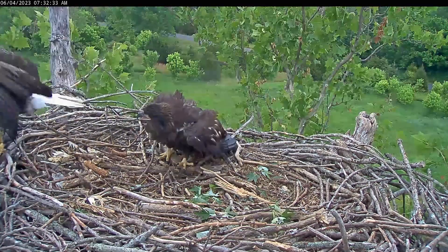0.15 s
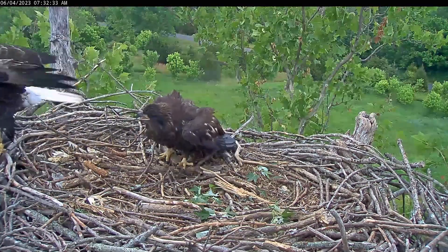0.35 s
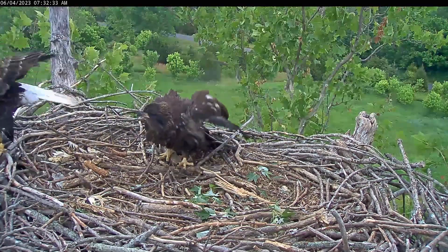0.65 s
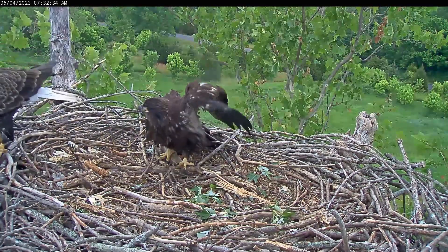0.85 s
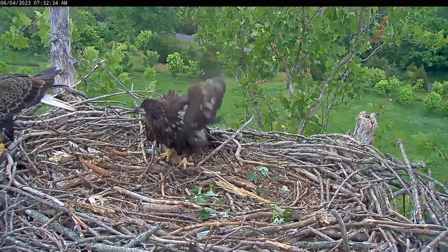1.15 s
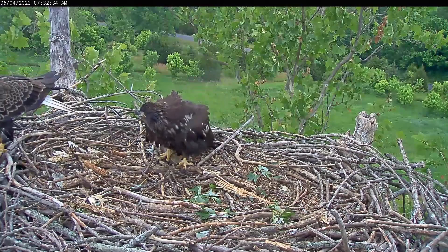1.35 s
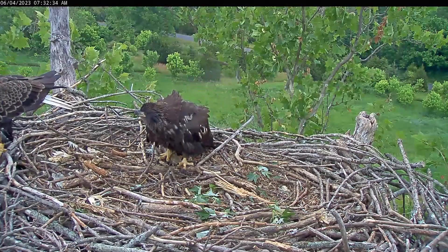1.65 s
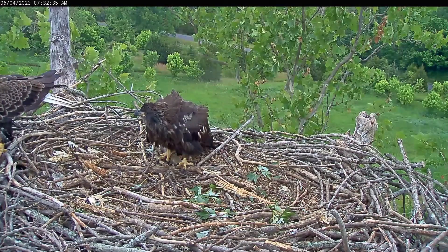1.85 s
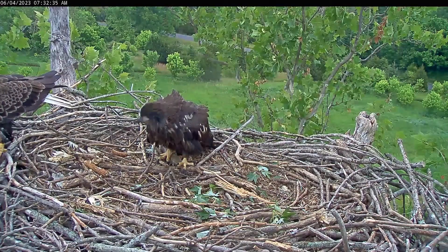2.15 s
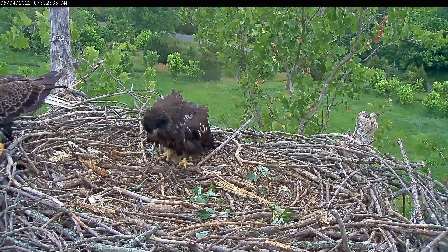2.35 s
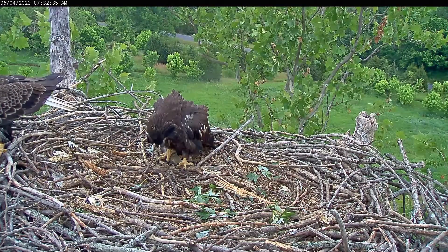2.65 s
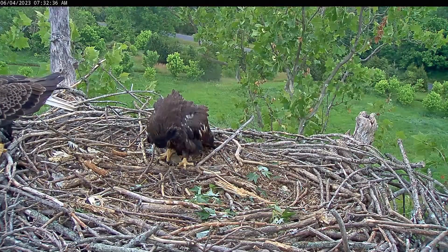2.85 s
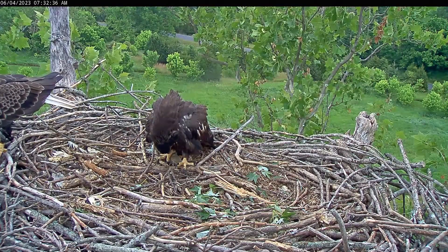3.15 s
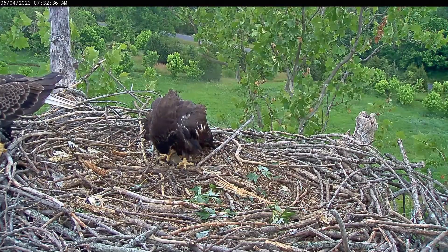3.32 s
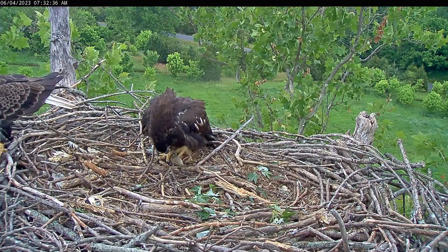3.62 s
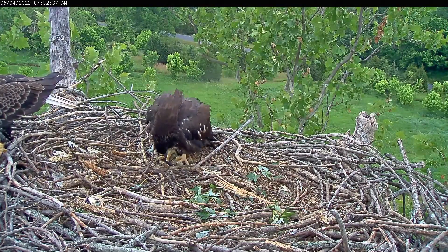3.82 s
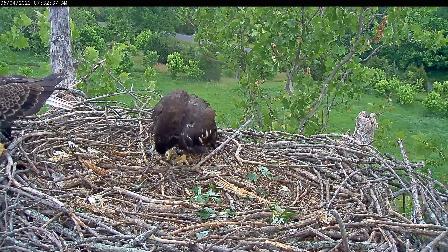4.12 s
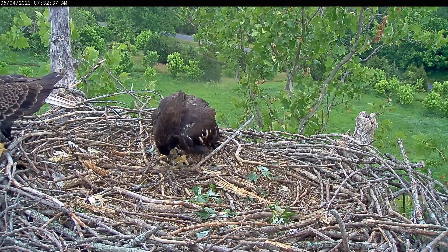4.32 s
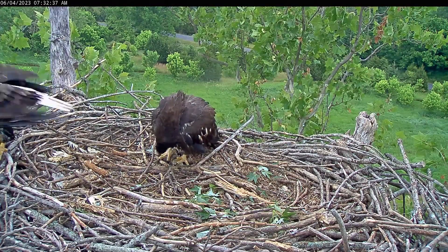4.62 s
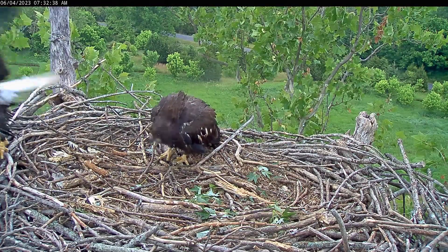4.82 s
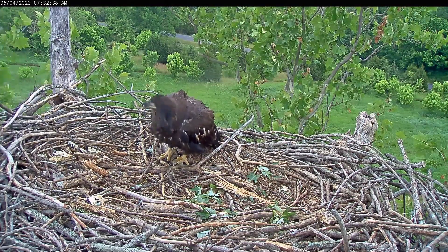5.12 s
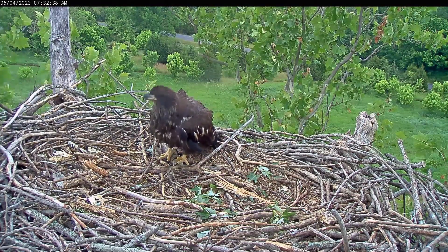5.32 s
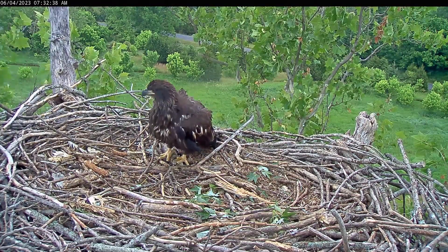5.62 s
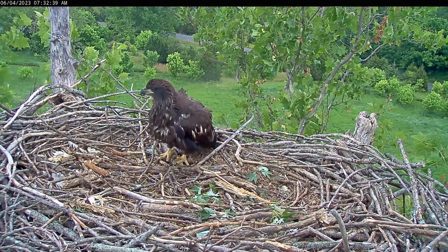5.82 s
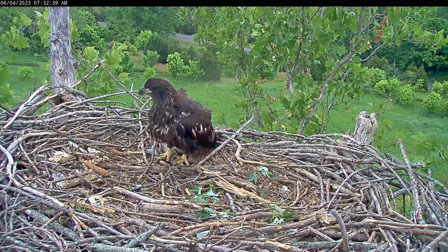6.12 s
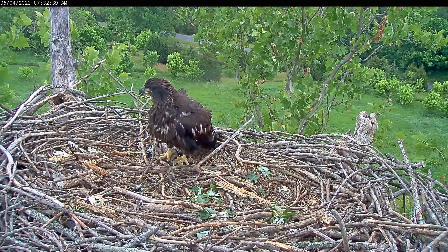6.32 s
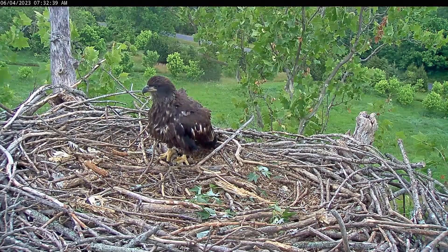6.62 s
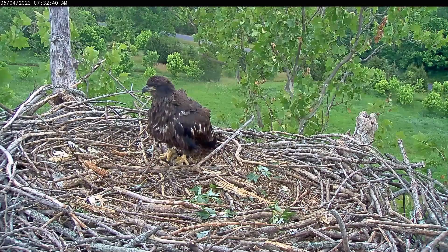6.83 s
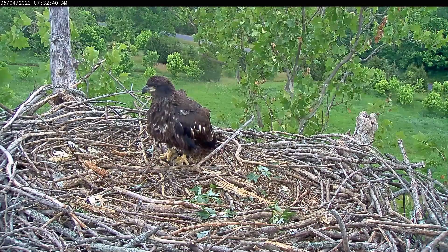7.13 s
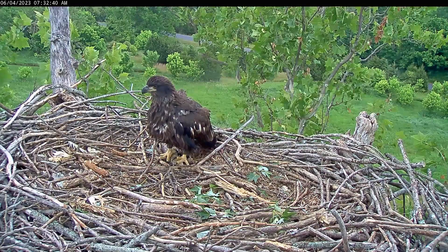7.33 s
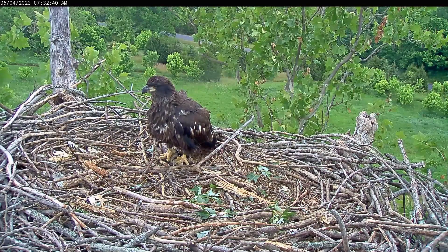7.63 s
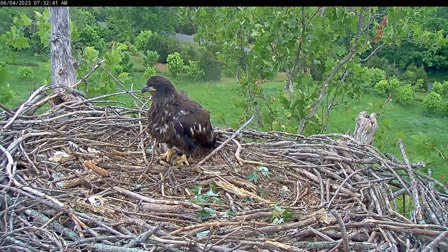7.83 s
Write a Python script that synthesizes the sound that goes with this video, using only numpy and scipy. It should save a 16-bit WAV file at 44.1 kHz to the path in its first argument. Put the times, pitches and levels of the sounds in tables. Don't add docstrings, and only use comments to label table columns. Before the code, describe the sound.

Outdoors on a large stick nest, an eaglet's piercing squeals dominate, separated by short gaps of soft wind rumble and leaf hiss. A snap and rustle accompany an arrival at the start; wing brushing, knocks and deep thumps mark a departure just past five seconds. Soft throat pops precede several cries. The last calls are lower and weaker. Slight woodland echo, thin compressed sound from a fixed microphone.

```python
import sys
import numpy as np
from scipy import signal
from scipy.fft import rfft, irfft, next_fast_len
from scipy.io import wavfile
from scipy.ndimage import uniform_filter1d, map_coordinates

SR = 44100
rng = np.random.default_rng(int(sys.argv[2]) if len(sys.argv) > 2 else 0)


def volts(x):
    e = np.asarray(x, float) / 20
    return 10 ** e


def wav_out(sig):
    wavfile.write(sys.argv[1], SR, np.round(np.clip(np.atleast_2d(sig).T, -1, 1) * 32767).astype(np.int16))


N = 351477
T = np.arange(N) / SR


def unit(x):
    return x / np.sqrt(np.mean(x ** 2) + 1e-20)


def wobble(rate):
    return map_coordinates(rng.standard_normal(int(N * rate / SR) + 4), [np.arange(N) * rate / SR])


def rush(spectrum):
    size = next_fast_len(N + 8192)
    hz, db = np.transpose(spectrum)
    bins_hz = np.fft.rfftfreq(size, 1 / SR) + 1
    gain = volts(np.interp(np.log(bins_hz), np.log(hz), db, -120, -120))
    return unit(irfft(rfft(rng.standard_normal(size)) * gain, size)[:N])


def window(start, end, edge=.012):
    return np.clip(np.minimum(T - start, end - T) / edge + .5, 0, 1)


def played(phrases, edge):
    t, *columns = np.transpose([row for rows in phrases for row in rows])
    gate = sum(window(rows[0][0], rows[-1][0], edge) for rows in phrases)
    return [np.interp(T, t, column) for column in columns], np.minimum(gate, 1)


def glide(hz):
    return 2 * np.pi * np.cumsum(hz) / SR


def strike(out, t, sound):
    out[round(t * SR):][:len(sound)] += sound


# f/Hz, level/dB per Hz
WIND = [(10, -16.5), (60, 1.5), (112, -8.5), (200, -28.5), (330, -31.5), (654, -28.5), (900, -42.5),
        (2200, -49)]
# t/s, level/dB
GUSTS = [(0, -0.5), (2, -3.5), (3.3, -1), (4.4, -4.5), (5.6, 2), (5.85, 6), (6.05, -0.5), (7, -1.5)]
# f/Hz, level/dB per Hz
FOLIAGE = [(880, -57.5), (1500, -31.5), (2260, -10.5), (3450, -4.5), (4110, -8), (4950, -11.5),
           (6270, -11.5), (7000, -14.5)]
# f/Hz, level/dB
HUMS = [(820, -75), (2040, -72.5)]


def air():
    rumble = volts(-47.5 + 1.5 * wobble(8.8)) * rush(WIND)
    gust_db = np.interp(T, *np.transpose(GUSTS))
    leaves = volts(-55 + gust_db + 1.3 * wobble(6)) * rush(FOLIAGE)
    whines = sum(volts(db + 1.1 * wobble(3.6)) * np.sin(2 * np.pi * hz * T + .8 * wobble(21)) for hz, db in HUMS)
    return rumble + leaves + whines


def woods(x):
    t = np.arange(SR // 2) / SR
    near, far = volts(-60 * t / .15), volts(-32 - 60 * t / .9)
    tail = rng.standard_normal(len(t)) * (near + far)
    return signal.fftconvolve(x, tail / np.linalg.norm(tail))[:N]


# t/s, rustle level/dB, sway level/dB
BEATS = [
    (.14, -48.5, -35),
    (5.129, -57.5, -69.5),
    (5.26, -52.5, -43.5),
    (5.489, -55.5, -30),
    (5.56, -55.5, -41),
    (5.639, -64, -48),
    (5.788, -56, -33.5),
    (5.9, -58.5, -45),
    (6.061, -61, -36.5),
]


def beats(column, rise, fall):
    power = 0
    for row in BEATS:
        away_db = np.maximum(rise * (row[0] - T), fall * (T - row[0]))
        power = power + volts(row[column] - away_db) ** 2
    return np.sqrt(power)


# f/Hz, level/dB per Hz
RUSTLE = [(120, -8), (250, 0), (500, -2), (900, -10), (2200, -24)]
# f/Hz, level/dB per Hz
SWAY = [(4, 4), (25, 0), (60, -9), (115, -11), (200, -30)]
# t/s, peak level/dB, treble level/dB
SNAPS = [
    (0.14, -25, 11),
    (0.192, -52, 38.5),
    (5.124, -31, -9),
    (5.507, -41, 7),
    (5.78, -40.5, 5),
    (5.892, -40, -15),
]
# t/s, peak level/dB, f/Hz
THUMPS = [
    (5.25, -34, 122),
    (5.62, -40.5, 121),
    (5.505, -43.5, 150),
    (5.13, -47.5, 187),
]


def nest():
    clumps = volts(2.5 * wobble(40) + 1.5 * wobble(200))
    brush = beats(column=1, rise=86, fall=99) * unit(clumps * rush(RUSTLE))
    sway = beats(column=2, rise=350, fall=250) * unit(volts(1.5 * wobble(18)) * rush(SWAY))
    out = np.pad(brush + sway, (0, SR))
    t = np.arange(900) / SR
    for start, db, treble_db in SNAPS:
        knock = np.sin(2 * np.pi * 650 * t) * volts(-60 * t / 0.015)
        bright = np.diff(rng.standard_normal(len(t) + 1)) / 2
        crack = volts(treble_db + 10.0 - 60 * t / 0.0077) * bright
        strike(out, start, volts(db - 7.5) * (knock + crack))
    t = np.arange(SR // 4) / SR
    for start, db, hz in THUMPS:
        swell = volts(db + 7 - 60 * t / .15) * (1 - np.exp(-t / 0.011))
        strike(out, start, swell * np.sin(2 * np.pi * hz * t))
    return out[:N]


# t/s, peak level/dB, f/Hz, overtone level/dB
CLUCKS = [
    (0.964, -37.5, 595, -15),
    (1.476, -42.5, 444, -11),
    (2.164, -43, 573, -14.5),
    (3.455, -32, 592, -20),
    (4.574, -36, 603.5, -20),
    (7.209, -40.5, 481.7, -32),
]


def clucks():
    out, t = np.zeros(N + SR), np.arange(2000) / SR
    for start, db, hz, over_db in CLUCKS:
        ring = np.sin(2 * np.pi * hz * t) + volts(over_db) * np.sin(2 * np.pi * 2.15 * hz * t)
        swell = volts(db + 2.5 - 60 * t / 0.029) * (1 - np.exp(-t / 0.013))
        strike(out, start, swell * ring)
    return out[:N]


# start t/s, end t/s, gap at start f/Hz, gap at end f/Hz, level/dB over the first
SPELLS = [(-.01, .085, 619, 700.5, 1.5), (1, 1.21, 1040.5, 896.5, -15), (1.22, 1.3, 943.5, 790.5, -2),
          (1.3, 1.336, 791.5, 1051.5, 0), (1.336, 1.38, 1051.5, 803.5, 3), (2.29, 2.36, 682.5, 681, -10),
          (2.47, 2.55, 639, 627.5, 4), (2.56, 2.6, 701.5, 674.5, 5.5), (2.6, 2.72, 670.5, 545.5, 2.5),
          (2.74, 2.83, 641, 616.5, 2.5), (3.57, 3.71, 389.5, 357, 4.5), (4.7, 4.785, 447.5, 384.5, 2.5),
          (4.885, 4.975, -520, -430, -14.5), (6.19, 6.3, 672, 849, -12.5), (6.35, 6.5, 863, 844, -13.5),
          (6.56, 6.63, 828, 852.5, -9.5), (7.225, 7.27, 247.5, 589.5, 3.5), (7.27, 7.33, 622.5, 506, -17),
          (7.33, 7.39, 477.5, 712, 14), (7.39, 7.44, 701.5, 557, 4), (7.44, 7.5, 554.5, 591.5, -24),
          (7.5, 7.66, 593.5, 655.5, -4), (7.66, 7.74, 655, 683.5, -14.5), (7.74, 7.84, 681, 694, -3.5)]
CREST_SPELLS = [(0.093, 0.143, 688.5, 718.5, -4), (0.137, 0.26, 719.5, 700.5, -13.5),
                (0.261, 0.286, 719.5, 1080.5, -10), (0.288, 0.311, 1079.5, 1160, -9),
                (0.313, 0.347, 1160, 1039, -7.5), (0.346, 0.38, 1040, 699.5, -7.5), (0.379, 0.572, 722, 838, -14),
                (1.39, 1.463, 599, 612, -1.5), (1.462, 1.765, 800, 872.5, 0), (2.846, 2.882, 420, 319.5, -3.5),
                (2.882, 2.905, 402, 448.5, -7), (3.747, 3.787, 601, 601.5, -21), (3.887, 3.979, 600, 560, -21),
                (4.013, 4.11, 700, 639.5, -17.5), (4.138, 4.157, 680, 701, -22), (4.21, 4.254, 649, 1201.5, -10.5),
                (5.055, 5.111, 950, 780.5, -24), (5.107, 5.147, 816.5, 778, -11), (5.157, 5.245, 619, 620.5, -6.5),
                (5.254, 5.302, 559.5, 479.5, -8.5), (5.302, 5.337, 558, 621, 3), (5.346, 5.42, 380, 449.5, -9.5),
                (5.444, 5.531, -750, -420, -9.5), (5.535, 5.601, 1800, 1759.5, -3.5)]
# middle t/s, half length t/s, added roughness
FRAYS = [(1.43, .09, .24), (1.53, .08, .1), (2.77, .05, .3), (2.87, .035, .45), (7.42, .12, .12),
         (7.62, .1, .1), (5.19, .06, .3), (5.3, .07, .32), (5.42, .13, .32)]


def spells(starts_s, ends_s):
    rows = sorted(SPELLS + CREST_SPELLS)
    knots_s = np.maximum.accumulate([s for row in rows for s in row[:2]])
    gap_hz = np.interp(T, knots_s, [hz for row in rows for hz in row[2:4]])
    leak = volts(-40)
    joined = leak + sum(volts(db) * window(start, end) for start, end, _, _, db in rows)

    def bump(middle, half):
        return np.clip(1 - abs(T - middle) / half, 0, 1)

    attack_s, release_s = 0.024, .04
    edge = sum(bump(s, attack_s) for s in starts_s) + sum(bump(s, release_s) for s in ends_s)
    fray = sum(added * bump(s, half) for s, half, added in FRAYS)
    return gap_hz, joined, edge, fray


# t/s, pitch f/Hz, effort level/dB
FIRST = [
    [(0, 3085, -26), (.042, 3085, -29.5), (.085, 3120, -31.5)],
    [(.0856, 3830, -23), (.135, 3920, -23.5), (.158, 4010, -12.5), (.195, 4070, -11), (.215, 3930, -22),
     (.31, 4075, -20), (.43, 3850, -19.5), (.475, 3810, -14.5), (.525, 3870, -20.5)],
    [(.562, 3850, -16), (.595, 3700, -17.5), (.63, 3500, -43.5)],
]
SECOND = [
    [(.978, 2780, -29), (1.01, 3070, -31), (1.09, 2892, -32), (1.2, 2968, -31), (1.242, 3176, -41),
     (1.272, 3095, -33), (1.3, 3380, -36.5), (1.336, 3085, -30), (1.37, 3400, -37.5)],
    [(1.38, 3450, -32), (1.425, 3780, -26), (1.49, 3460, -28.5), (1.56, 3513, -30.5), (1.6, 3590, -27),
     (1.65, 3540, -25), (1.73, 3420, -27.5), (1.78, 2560, -32.5), (1.8, 2500, -52)],
]
THIRD = [
    [(2.178, 2697, -41.5), (2.2, 2682, -31), (2.238, 2630, -34), (2.29, 2696, -43), (2.396, 2903, -33.5),
     (2.478, 3170, -36), (2.565, 3115, -40.5), (2.59, 3324, -31), (2.72, 3440, -31)],
    [(2.73, 3510, -27.5), (2.765, 3496, -25.5), (2.838, 3470, -31), (2.853, 3801, -23.5), (2.88, 3902, -20),
     (2.902, 3534, -26), (2.94, 3495, -26.5), (3.102, 3494, -25.5), (3.16, 3190, -46.5)],
]
FOURTH = [
    [(3.47, 2990, -40.5), (3.498, 3277, -33.5), (3.55, 3073, -39), (3.618, 3277, -34.5), (3.688, 3274, -38),
     (3.71, 3292, -34), (3.745, 3496, -27), (3.77, 3387, -27)],
    [(3.776, 3854, -24), (3.786, 3805, -23.5), (3.8, 4037, -14.5), (3.824, 4025, -14.5), (3.878, 4034, -17),
     (3.924, 4140, -20), (4.01, 4186, -15.5), (4.04, 3983, -15), (4.07, 4090, -15)],
    [(4.1, 4108, -16.5), (4.132, 3993, -12.5), (4.148, 3920, -18.5), (4.164, 4018, -13.5),
     (4.186, 4087, -14), (4.206, 4016, -15), (4.216, 3740, -27), (4.235, 3300, -35.5), (4.26, 3250, -56.5)],
]
FIFTH = [
    [(4.59, 3467, -40), (4.62, 3253, -33.5), (4.665, 3111, -36), (4.73, 3328, -41.5), (4.79, 3340, -36.5),
     (4.84, 3317, -35), (4.882, 3340, -33)],
    [(4.888, 3995, -27), (4.93, 3970, -24), (4.967, 3864, -25.5), (5.024, 4090, -11.5), (5.045, 4030, -11),
     (5.058, 3965, -13), (5.1, 4010, -12), (5.118, 3720, -24)],
    [(5.145, 3630, -22.5), (5.158, 3800, -19), (5.2, 3790, -26), (5.24, 3700, -27.5), (5.258, 3990, -20),
     (5.275, 4080, -17), (5.298, 4040, -20), (5.318, 3760, -27.5), (5.335, 3780, -24.5)],
    [(5.342, 4150, -22), (5.368, 4050, -19.5), (5.4, 4060, -23.5), (5.435, 4240, -25), (5.466, 4420, -23),
     (5.5, 4380, -23.5), (5.524, 4200, -28), (5.534, 3900, -45)],
    [(5.54, 3575, -28.5), (5.596, 3520, -34), (5.612, 2950, -28), (5.626, 2470, -36.5), (5.635, 2450, -62)],
]
SIXTH = [
    [(6.036, 3033, -38), (6.056, 2973, -31), (6.11, 2834, -33), (6.18, 2854, -35), (6.222, 3076, -38.5),
     (6.26, 2962, -29.5), (6.29, 3060, -34), (6.325, 2935, -32)],
    [(6.36, 3035, -31.5), (6.435, 3043, -33), (6.476, 3196, -35), (6.53, 2939, -29), (6.565, 3013, -35),
     (6.6, 3137, -36.5), (6.634, 2936, -31.5), (6.662, 2626, -34.5), (6.68, 2580, -65)],
]
SEVENTH = [
    [(7.232, 2918, -45.5), (7.262, 2850, -48.5), (7.272, 2784, -35.5), (7.31, 2641, -39.5),
     (7.342, 2680, -53), (7.39, 2717, -48), (7.43, 2705, -47.5), (7.46, 2770, -35), (7.51, 2667, -45)],
    [(7.58, 3020, -40.5), (7.636, 2730, -42), (7.66, 2745, -40), (7.715, 2695, -36), (7.745, 2926, -40.5)],
    [(7.765, 3005, -40), (7.82, 2950, -40), (7.835, 2885, -36), (7.87, 2812, -32), (7.9, 2697, -35.5),
     (7.928, 2515, -47.5), (7.935, 2415, -62)],
]
# roughness 0-1, coupling of the two sides level/dB
TEMPER = [(.1, -3), (.19, -19.4), (.2, -19), (.12, -7), (.22, -18), (.15, -5.5), (.14, -11), (.2, -2),
          (.1, -19.5), (.1, -19.5), (.14, -4), (.13, -19.2), (.28, -10), (.32, -14), (.08, -17), (.14, 0),
          (.14, 0), (.1, -3), (.1, -3), (.1, -3)]
# octave over its rule level/dB, rasp under the effort level/dB
MOUTH = [(1, -16.5), (-1.5, -16.5), (-3.5, -19), (-3, -20), (-4.5, -19.5), (1.5, -19), (2.5, -18.5),
         (-5.5, -18.5), (12, -23), (3, -21), (5, -18), (5, -22), (-5.5, -17), (-1, -13), (-6.5, -15.5),
         (1.5, -20.5), (0, -26), (6, -24.5), (9.5, -19), (6, -23)]
# pitch f/Hz, level/dB over the effort
OCTAVE = [(2600, -10.5), (2900, -9), (3150, 5.5), (3330, 2), (3440, -6), (3550, -23.5), (3900, -32.5)]
# t/s, depth level/dB
CATCHES = [(.137, 7.5), (0.169, 7.5), (0.183, 9.5), (0.203, 24), (0.271, 6), (0.356, 6), (0.392, 3),
           (0.501, 6.5), (.588, 11), (.597, 8), (1.584, 8), (1.645, 3), (1.673, 11.5), (1.76, 13.5),
           (1.774, 2.5), (2.187, 17.5), (2.226, 26), (2.752, 2), (2.765, 6), (2.779, 8), (2.789, 11.5),
           (2.848, 4), (3.486, 17), (3.89, 9.5), (3.911, 6), (4.004, 6.5), (4.047, 13), (4.068, 7.5),
           (4.078, 13.5), (4.092, 9), (4.151, 11), (4.605, 19.5), (5.066, 0), (5.152, 12.5), (5.16, 13),
           (5.177, 10.5), (5.188, 8), (5.207, 12), (5.238, 5), (5.276, 9), (5.292, 4), (5.381, 6),
           (5.437, 2.5), (5.515, 10.5), (7.32, 11), (7.392, 14), (7.439, 12), (7.889, 16)]


def breath():
    manner = iter(zip(TEMPER, MOUTH))
    phrases = []
    for squeal in (FIRST, SECOND, THIRD, FOURTH, FIFTH, SIXTH, SEVENTH):
        rows = []
        for note in squeal:
            temper, mouth = next(manner)
            rows += [(*row, *temper, *mouth) for row in note]
        phrases.append(rows)
    (low_hz, effort_db, rough, couple_db, open_db, rasp_db), gate = played(phrases, edge=0.0013)
    starts_s, ends_s = [rows[0][0] for rows in phrases[1:]], [rows[-1][0] for rows in phrases]
    gap_hz, joined, edge, fray = spells(starts_s, ends_s)
    chop_db, chop_rate = 13, 75
    effort_db = effort_db + fray * chop_db * (.6 - abs(wobble(chop_rate)))
    catch_s = 0.0027
    effort_db = effort_db - sum(db * np.exp(-((T - s) / catch_s) ** 2) for s, db in CATCHES)
    share = joined ** 2 / (1 + joined ** 2)
    low_db = effort_db + 10 * np.log10(1 - share)
    high_db = effort_db + 10 * np.log10(share)
    octave_db = effort_db + 1.63 * (low_db - effort_db) + open_db
    octave_db = octave_db + np.interp(low_hz, *np.transpose(OCTAVE))
    rasp_db = effort_db + rasp_db - 17 * fray + 9.5 * edge + 11 * share
    rough = rough + fray + .45 * edge
    return low_hz, low_db, gap_hz, high_db, octave_db, rasp_db, rough, couple_db, gate


# start t/s, end t/s, first f/Hz, last f/Hz, level/dB
THREADS = [(2.235, 2.29, 3340, 3090, -53), (2.467, 2.59, 2520, 2620, -48.5),
           (2.59, 2.719, 2638, 2960, -46.5), (2.739, 2.84, 2910, 2860, -45.5),
           (3.27, 3.33, 3220, 3560, -55), (3.329, 3.428, 3570, 3540, -55), (5.264, 5.54, 3530, 3570, -39),
           (5.505, 5.558, 5400, 5370, -36), (7.235, 7.262, 5940, 6750, -37), (7.56, 7.655, 4270, 4020, -50),
           (7.894, 7.931, 6670, 6050, -38.5)]


def threads():
    out = 0
    for start, end, first_hz, last_hz, db in THREADS:
        hz = np.interp(T, (start, end), (first_hz, last_hz)) + 18 * wobble(45)
        out = out + volts(db + 2.7 * wobble(50)) * window(start, end) * np.sin(glide(hz))
    return out


# t/s, level/dB
STRAIN = [(3.76, -60.5), (3.82, -55), (4.05, -59), (4.25, -75.5)]


def strain():
    (db,), leak = played([STRAIN], edge=.03)
    return leak * volts(db + 2.3 * wobble(50)) * rush([(900, -5.5), (1100, -6.5), (1900, 1.0), (2300, 2.0)])


# start t/s, end t/s, octave loss level/dB, side tone gain level/dB
SPLITS = [(1.04, 1.22, 0, 18), (2.29, 2.36, 2, 19), (2.585, 2.72, 2, 12), (7.51, 7.63, 10, 2),
          (7.725, 7.83, 10, 2)]
# f/Hz, level/dB per Hz
BEAK = [(1700, -48), (2200, -19), (2900, -7), (3600, -8.5), (4300, -5), (5300, -13.5), (6300, -5),
        (6950, -5.5)]


def eaglet():
    low_hz, low_db, gap_hz, high_db, octave_db, rasp_db, rough, couple_db, gate = breath()
    lost_db = sum(loss * window(start, end) for start, end, loss, _ in SPLITS)
    gained_db = sum(gain * window(start, end) for start, end, _, gain in SPLITS)

    def tremor():
        return 12 * wobble(40) + rough * (55 * wobble(60) + 150 * wobble(400))

    def flicker():
        return -np.abs(3.18 * wobble(35)) + rough * 3 * wobble(160)

    low = glide(low_hz + tremor())
    loose = np.clip((-couple_db - 18) / 5, 0, 1)
    gap = glide(gap_hz + 0.45 * tremor() + loose * 420 * wobble(1100))
    high = low + gap
    weaker_db = np.minimum(low_db, high_db) + couple_db
    beside_db = octave_db + np.clip(high_db - low_db, -40, -2) + couple_db + gained_db
    under_db = np.clip(2500 - low_hz + gap_hz, 0, 900) / 30
    main_tones = [(low, low_db), (high, high_db),
                  (2 * low, octave_db - lost_db), (2 * high, high_db + couple_db + 13.0)]
    coupled_tones = [(2 * low + gap, beside_db + 3.0), (2 * low - gap, beside_db - 7.0),
                     (low + 2 * gap, weaker_db), (low + 3 * gap, weaker_db - 12.0),
                     (low - gap, weaker_db - 8.5 - under_db)]
    whistle = sum(volts(db + 4.5 + flicker()) * np.sin(phase) for phase, db in main_tones)
    for phase, db in coupled_tones:
        patchy_db = 6.5 * abs(wobble(22))
        whistle = whistle + volts(db + 5.5 + flicker() - patchy_db) * np.sin(phase)
    carriers = volts(low_db) * np.sin(low) + volts(high_db) * np.sin(high)
    skirt = rush([(1, -15.5), (350, 2.5), (800, -24.0)]) * carriers
    skirt = volts(-1.0) * (rough ** 2 + 0.044) * skirt
    between = rough * volts(np.minimum(low_db, high_db) + 4.0) * np.sin(low + gap / 2)
    between = between * rush([(1, 2), (260, -5), (600, -30.5)])
    halo_db = -42 + 1.4 * (low_db + 20) + 2.5 * wobble(70)
    halo = volts(halo_db) * rush([(1, 0), (230, -2), (420, -25)]) * np.sin(low + 2 * np.pi * 379.3 * T)
    rasp = volts(rasp_db + 1.6 * wobble(60)) * rush(BEAK)
    return gate * (whistle + skirt + between + halo + rasp) + strain() + threads()


def scene():
    bird = eaglet() + clucks()
    return np.tile(bird + volts(-9.0) * woods(bird) + nest() + air(), (2, 1))


def thrift(x, under_db, reach_hz, grit_db):
    band_hz, top_hz = 170, 6950
    hz, _, z = signal.stft(x, SR, nperseg=3072)
    band = (hz / band_hz).astype(int)
    exact = np.array([np.mean(abs(z[band == b]) ** 2, 0) for b in range(band[-1] + 1)])
    row = np.arange(len(exact))[:, None]
    power = uniform_filter1d(exact, size=3, axis=1)
    spread = np.exp(-abs(row - row.T) * band_hz / reach_hz) + .004
    mask = np.max(spread[:, :, None] * power, axis=1)
    luck_db = 21 * uniform_filter1d(rng.standard_normal(power.shape), size=10, axis=1)
    weak = np.maximum(power, exact / 2) < volts(2 * under_db + luck_db) * mask
    keep = np.where(weak & (row > 13), .03, 1)[band]
    grit = volts(grit_db) * np.sqrt(exact[band]) * np.exp(2j * np.pi * rng.random(z.shape))
    limited = (z + grit) * keep * (hz < top_hz)[:, None]
    return signal.istft(limited, SR, nperseg=3072)[1][:N]


# f/Hz, level/dB per Hz
HISS = [(7000, -6), (8500, -6), (9500, -1), (12000, 0), (15750, 0)]


def circuit_hiss():
    sides = .15 * np.array([[1], [-1]]) * rush(HISS)
    return volts(-84) * (rush(HISS) + sides)


def roll_off(x):
    return signal.sosfilt(signal.butter(12, 15750, fs=SR, output="sos"), x)


def record(dry):
    x = thrift(dry[0], under_db=-14.5, reach_hz=215, grit_db=-18)
    x = x * np.minimum(np.arange(N) / 150, 1)
    return roll_off(x + circuit_hiss())


dry = scene()
out = record(dry)
wav_out(out)
```